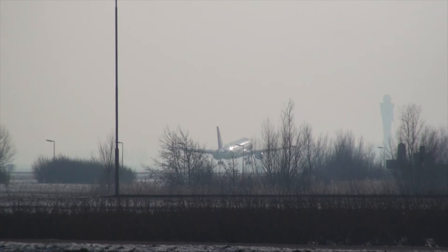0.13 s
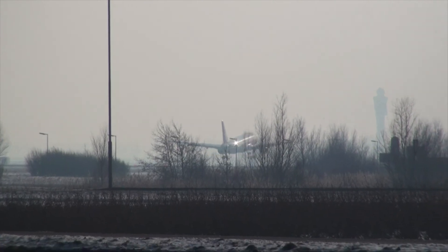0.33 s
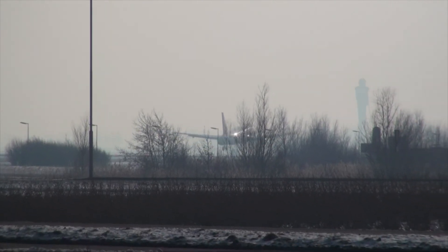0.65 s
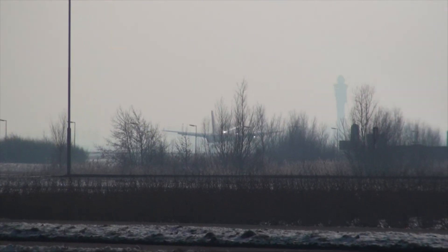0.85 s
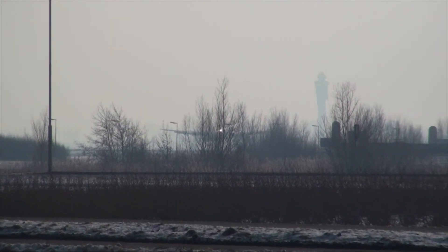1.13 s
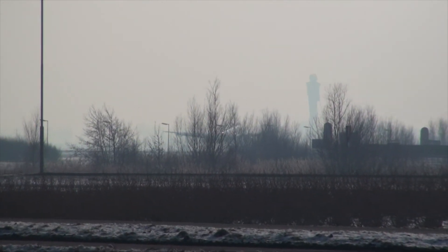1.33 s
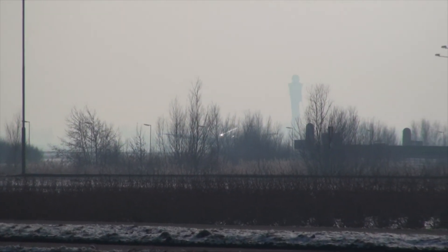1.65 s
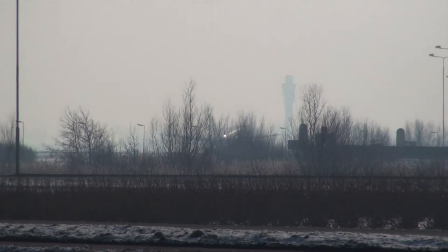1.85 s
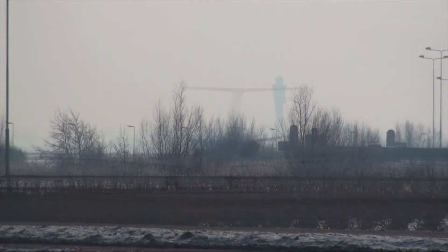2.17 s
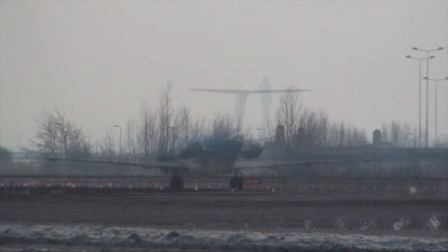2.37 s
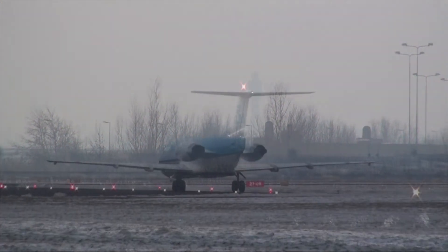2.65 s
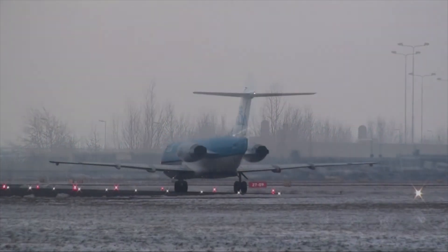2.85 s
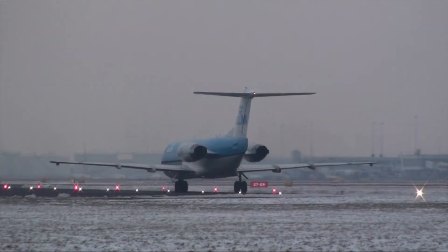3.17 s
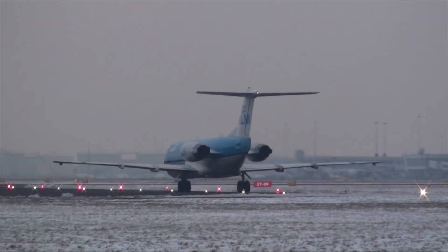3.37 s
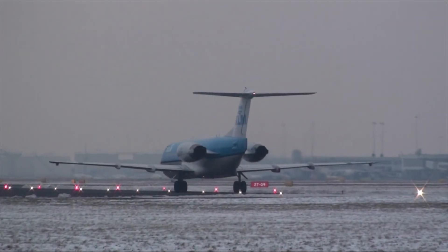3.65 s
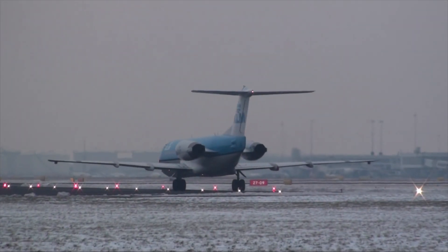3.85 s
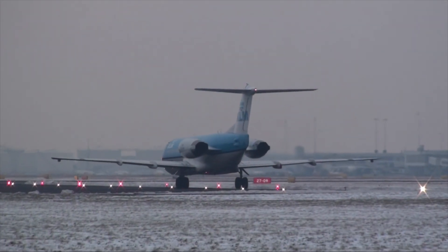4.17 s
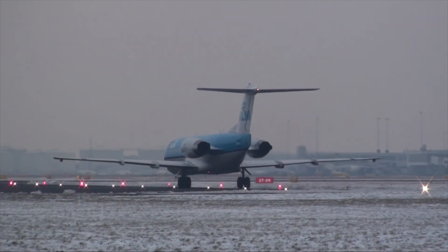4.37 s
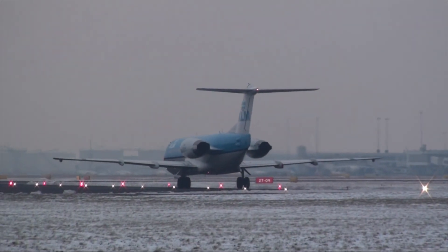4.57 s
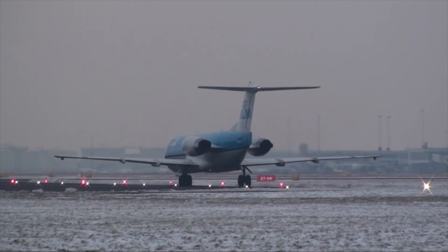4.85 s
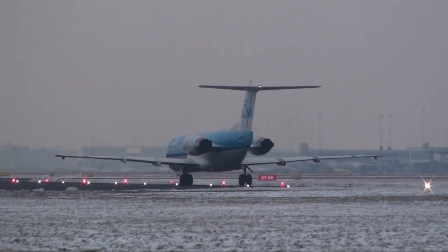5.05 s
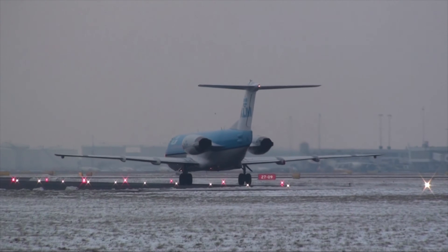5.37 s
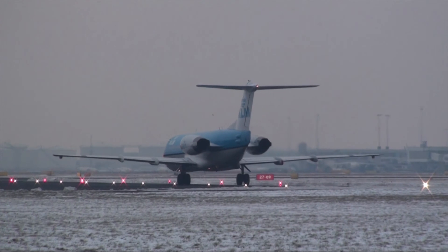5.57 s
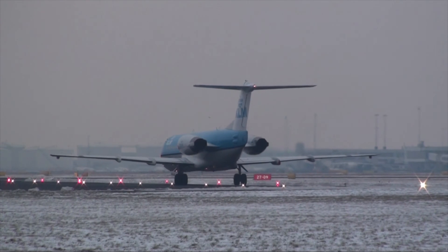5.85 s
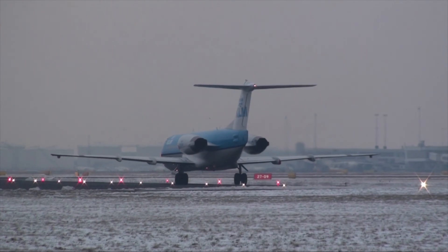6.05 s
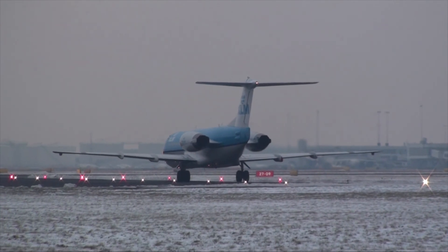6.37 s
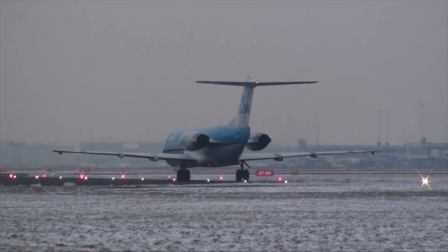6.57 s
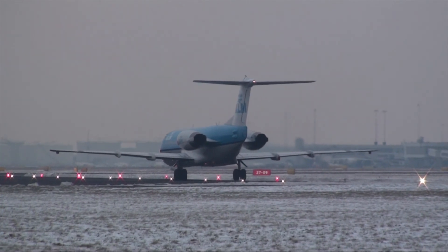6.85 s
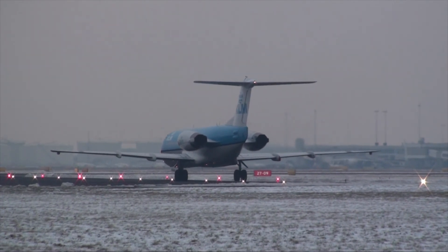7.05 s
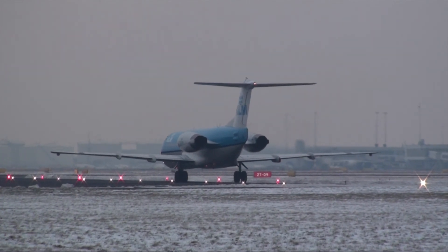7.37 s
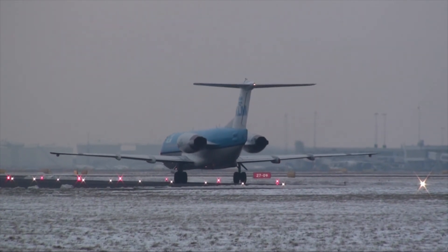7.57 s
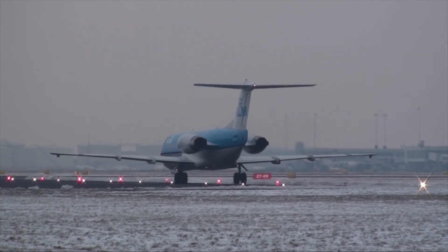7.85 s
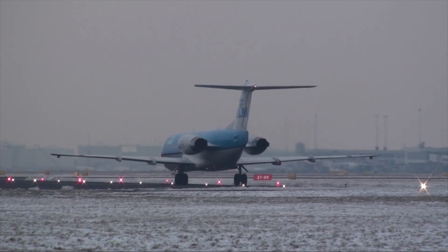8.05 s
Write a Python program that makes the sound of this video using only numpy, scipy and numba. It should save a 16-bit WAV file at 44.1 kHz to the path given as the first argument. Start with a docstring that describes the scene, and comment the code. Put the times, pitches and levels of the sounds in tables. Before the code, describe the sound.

A distant jet's dull roar gives way to a nearer airliner's steady exhaust roar, with faint high whines and low thumps.

```python
"""An airfield in winter. First the dull roar of a far jet, with low thumps from big eddies throughout.
From about 2.1 s it cross-fades into a twin-jet airliner spooling up on the runway, heard from behind
over open ground. Moving air makes bands of its exhaust roar swell and sink, and faint fan whines,
locked to the shaft speeds, come and go. A limiter holds the peaks."""
import sys
import numpy as np
from scipy import signal
from scipy.io import wavfile
from scipy.ndimage import uniform_filter1d
from numba import njit

SR = 44100
rng = np.random.default_rng(int(sys.argv[2]) if len(sys.argv) > 2 else 0)


def wav_out(sig):
    """Save sig, one row per channel (or a flat mono array), as 16-bit PCM at SR to the path in sys.argv[1]."""
    wavfile.write(sys.argv[1], SR, np.round(np.clip(np.atleast_2d(sig).T, -1, 1) * 32767).astype(np.int16))


N = 362502
FRAME, HOP = 2048, 512


def amp(db):
    """Decibels to gain."""
    return 10 ** (np.asarray(db) / 20)


def over_time(rows, t):
    """Each column after the first, interpolated at times t."""
    times_s, *columns = np.transpose(rows)
    return [np.interp(t, times_s, column) for column in columns]


def stft_grid():
    """Frequencies (a column) and times (a row) of the short-time spectra."""
    return np.fft.rfftfreq(FRAME, 1 / SR)[:, None], np.arange(N // HOP + 5) * HOP / SR


def noise(spectrum, gain_db, patchy_db=0.7):
    """Unit-rms coloured noise, then shaped by gain_db and by random time-frequency patches."""
    hz, t = stft_grid()
    real, imag, patches = rng.standard_normal((len(t), len(hz), 3)).T
    patches = uniform_filter1d(patches, size=14, axis=0)
    patches = uniform_filter1d(patches, size=12, axis=1)
    points_hz, points_db = np.transpose(spectrum)
    bins = amp(np.interp(np.log(hz + 1), np.log(points_hz + 1), points_db)) * (real + 1j * imag)
    gain = amp(gain_db + patchy_db * patches / patches.std())
    plain = signal.istft(bins, nperseg=FRAME, noverlap=FRAME - HOP)[1]
    shaped = signal.istft(gain * bins, nperseg=FRAME, noverlap=FRAME - HOP)[1]
    return shaped[:N] / plain.std()


# Each row: frequency in Hz, relative density in dB.
HISS_SPECTRUM = [(100, -2.5), (6000, 3.5), (9000, 1), (13400, 1), (13600, -4.5), (14300, -6)]


def hiss():
    """Microphone self-noise."""
    return noise(HISS_SPECTRUM, gain_db=-71, patchy_db=1.1)


# Each row: time in seconds, rumble level in dB, roar level in dB.
FAR_LEVELS = [(0.0, -36, -30.5), (0.6, -36, -30), (0.75, -32, -30.5), (1.2, -30, -30), (1.7, -29, -31),
              (2.3, -32.5, -30.5)]
# Each row of both spectra: frequency in Hz, relative density in dB.
FAR_RUMBLE_SPECTRUM = [(12, -31.5), (20, -13), (38, 3.5), (64, 1), (140, -5.5), (162, -18.5), (200, -12),
                       (260, -39), (440, -120)]
FAR_ROAR_SPECTRUM = [(90, -30), (150, -11), (200, -11.5), (270, -4.5), (330, -12.5), (600, -9), (920, -3.5),
                     (1160, -8.5), (1500, -16), (2000, -25.5), (3000, -39.5), (4000, -51.5), (5000, -68),
                     (9000, -120)]


def far_jet():
    """Rumble and a roar that has lost its treble over the distance."""
    _, t = stft_grid()
    rumble_db, roar_db = over_time(FAR_LEVELS, t)
    return noise(FAR_RUMBLE_SPECTRUM, rumble_db) + noise(FAR_ROAR_SPECTRUM, roar_db)


# Speeds of three shafts, one list each. Each row: time in seconds, lowest whine in Hz.
SHAFT_WHINE_HZ = [
    [(3.7, 4362), (4.2, 4390), (5.2, 4460), (5.52, 4497), (6.5, 4578), (7.0, 4603), (8.22, 4635)],
    [(5.9, 4645), (6.6, 4590), (6.9, 4576), (7.1, 4578), (7.6, 4615)],
    [(5.9, 4515), (6.6, 4497)],
]
# Moments when the air lets a whine through. Each row: shaft index, multiple of its lowest whine,
# centre in seconds, half length in seconds, level in dB.
WHINE_SWELLS = [(0, 1, 3.0, .6, -69), (0, 1, 4.2, .3, -65), (0, 1, 5.0, .3, -67), (0, 1, 5.47, .1, -60),
                (0, 1, 6.6, .6, -67), (0, 1, 7.9, .5, -70), (0, 1.168, 5.0, .45, -79),
                (0, 1.26, 5.2, .25, -85), (0, 1.26, 6.5, .7, -83), (1, 1, 6.35, .25, -64),
                (1, 1, 6.85, .35, -65), (1, 1, 7.35, .2, -73), (2, 1, 3.0, .4, -70), (2, 1, 3.8, .3, -76),
                (2, 1, 5.4, .45, -65), (2, 1, 6.45, .22, -69)]


def fan_whines():
    """Sines locked to the shafts, fluttering on their way through turbulent air."""
    t, out = np.arange(N) / SR, np.zeros(N)
    cycles = [np.cumsum(over_time(rows, t)[0]) / SR for rows in SHAFT_WHINE_HZ]
    flutter = uniform_filter1d(rng.standard_normal((N, 2)), size=1000, axis=0) @ [1, 1j]
    air_gain = 0.95 + 0.42 * flutter / np.sqrt(np.mean(abs(flutter) ** 2))  # complex: level and phase
    for shaft, multiple, centre_s, half_s, level_db in WHINE_SWELLS:
        tone = (air_gain * np.exp(2j * np.pi * multiple * cycles[shaft])).real
        envelope = np.exp(-((t - centre_s) / half_s) ** 2)
        out += np.sqrt(2) * amp(level_db) * envelope * tone
    return out


# Each row: centre in seconds, peak level in dB.
EDDY_THUMPS = [(.846, -21), (1.046, -21), (1.446, -18), (1.701, -26), (2.076, -27), (2.369, -19),
               (2.802, -17), (3.208, -11), (3.953, -6), (4.071, -9.5), (4.256, -14), (4.82, -10.5),
               (4.953, -12), (5.667, -13.5), (5.959, -16), (7.164, -19), (7.246, -14), (7.616, -19),
               (7.774, -10.5), (7.864, -3), (8.021, -11)]


def eddy_thumps(pitch_hz=78, half_s=0.0087):
    """Each big eddy arrives as one low push with a dip on either side."""
    t, out = np.arange(N) / SR, np.zeros(N)
    for centre_s, peak_db in EDDY_THUMPS:
        offset_s = t - centre_s
        envelope = np.exp(-(offset_s / half_s) ** 2)
        out += amp(peak_db) * envelope * np.cos(2 * np.pi * pitch_hz * offset_s)
    return out


# Each row: time in seconds, eddy rumble level in dB, roar level in dB, air loss at 3 kHz in dB.
EXHAUST_LEVELS = [(2.2, -37, -35, 4), (2.4, -28, -29, -3), (2.7, -30, -24.5, -2), (2.85, -21, -24, -2.5),
                  (3.3, -24, -23, -1), (3.7, -22, -24, 0), (4.0, -20.5, -22.5, -.5),
                  (4.3, -19.5, -25, -1.5), (4.65, -27.5, -25.5, -1.5), (4.9, -19, -25, -4),
                  (5.2, -20, -24.5, -2), (5.5, -22, -22.5, -3.5), (5.9, -20, -23, 0),
                  (6.3, -25.5, -23, -1.5), (6.7, -30, -23, -2), (7.1, -27.5, -23, -1.5), (7.5, -26, -22, 0),
                  (7.7, -19.5, -21.5, -1.5), (8.2, -19, -21.5, 0)]
# Each row of both spectra: frequency in Hz, relative density in dB.
EXHAUST_RUMBLE_SPECTRUM = [(12, -45.5), (20, -14.5), (45, -3), (65, 4), (93, -0.5), (135, -9.5), (200, -14),
                           (260, -45), (440, -120)]
EXHAUST_ROAR_SPECTRUM = [(88, -33), (150, -5), (280, -4), (600, -7.5), (830, -4.5), (900, -1), (1030, -0.5),
                         (1150, -4), (1300, -5.5), (1650, -6), (1950, -11.5), (2450, -10), (3120, -16),
                         (3920, -34.5), (4700, -46.5), (5780, -59), (9790, -120)]
# Bands of the roar that swell or sink. Each row: centre in seconds, half length in seconds,
# centre in Hz, drift in octaves per second, half width in octaves, gain in dB.
AIR_SWELLS = [(3.15, .4, 1730, -0.37, 0.37, 6.5), (3.386, 0.16, 2350, -1.8, 0.37, 6),
              (3.83, 0.68, 1007, 0.061, 0.51, 3.5), (3.7, 0.35, 3660, 0.08, .2, 5),
              (4.067, 0.11, 395, -0.27, 0.65, -5.5), (4.349, 0.41, 2890, -0.7, 0.27, -5),
              (4.5, 0.27, 1770, 0.08, 0.32, 3.5), (5.0, 0.099, 2420, -0.13, .2, 3.5),
              (5.0, .3, 1380, -0.035, 0.13, -5.5), (5.798, 0.13, 750, -0.15, .25, -4),
              (4.999, 0.87, 262, 0.035, 0.49, 6), (5.799, 0.35, 2480, 0, .15, 3),
              (6.05, .17, 3330, 0, 0.41, 4), (6.55, 0.18, 3090, -0.29, 0.2, 6),
              (6.803, .5, 1760, 0.57, 0.31, 4.5), (7.34, 0.95, 288, 0.036, 0.38, 6),
              (7.45, 0.37, 883, 0.88, 0.32, 3.5), (7.9, .5, 4430, -1, 0.12, -1),
              (8.0, .2, 2460, -0.55, 0.16, 5)]


def near_exhaust():
    """Mixing noise of the two jets; moving air varies the treble loss and lifts or sinks bands."""
    hz, t = stft_grid()
    rumble_db, roar_db, loss_db = over_time(EXHAUST_LEVELS, t)
    path_db = -loss_db * np.minimum(hz / 3000, 1.6) ** 1.2
    for centre_s, half_s, centre_hz, drift_oct_per_s, half_oct, gain_db in AIR_SWELLS:
        offset_s = t - centre_s
        offset_oct = np.log2((hz + 1) / centre_hz) - drift_oct_per_s * offset_s
        path_db += gain_db * np.exp(-(offset_s / half_s) ** 2 - (offset_oct / half_oct) ** 2)
    return noise(EXHAUST_RUMBLE_SPECTRUM, rumble_db) + noise(EXHAUST_ROAR_SPECTRUM, roar_db + path_db)


def scene():
    """The far jet fades out as the near airliner comes in; eddies thump under both."""
    t = np.arange(N) / SR
    fade_start_s, fade_end_s, near_rise_s = 2.133, 2.76, 0.13
    far_gain = np.clip((fade_end_s - t) / (fade_end_s - fade_start_s), 0, 1)
    near_gain = np.clip((t - fade_start_s) / near_rise_s, 0, 1)
    return (far_gain * far_jet() + near_gain * (near_exhaust() + fan_whines()) + eddy_thumps())[None]


@njit
def limiter(x, ceiling, attack_s, release_s):
    """Gain drops fast on a peak over the ceiling, ticking faintly in the treble, then creeps back."""
    out, gain = np.empty_like(x), 1.0
    for i in range(len(x)):
        target = min(1.0, ceiling / (abs(x[i]) + 1e-9))
        lag_s = attack_s if target < gain else release_s
        gain += (target - gain) / (lag_s * SR)
        out[i] = gain * x[i]
    return out


def record(dry, bass_cut_hz=20, band_edge_hz=14340):
    """Self-noise, peak limiter, bass cut and band limit."""
    limited = limiter(dry[0] + hiss(), ceiling=amp(-9.6), attack_s=0.00018, release_s=0.07)
    highpassed = signal.lfilter(*signal.butter(2, bass_cut_hz, "high", fs=SR), limited)
    lowpass_taps = signal.firwin(511, band_edge_hz, window=("kaiser", 9), fs=SR)
    return signal.oaconvolve(highpassed, lowpass_taps, "same")[None]


dry = scene()
out = record(dry)
wav_out(out)
```